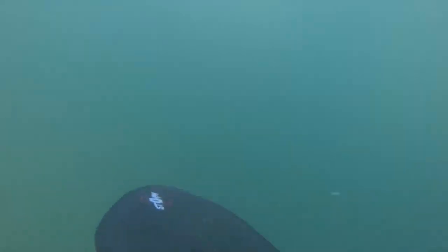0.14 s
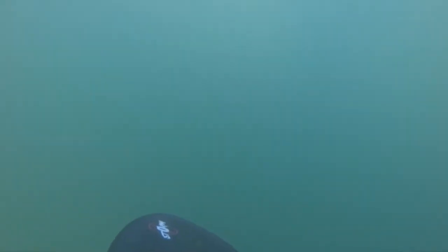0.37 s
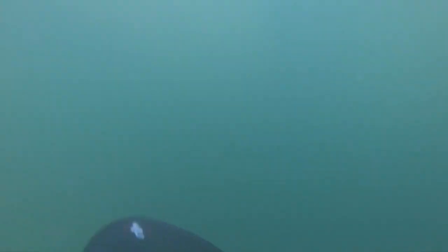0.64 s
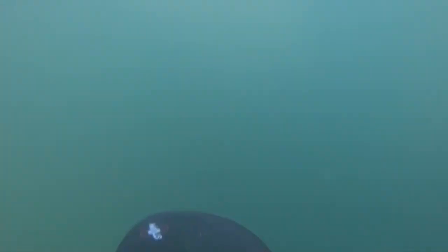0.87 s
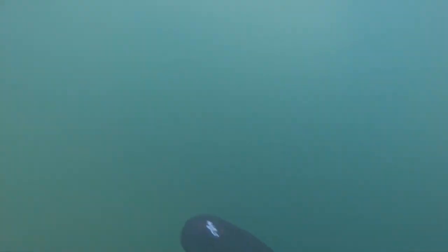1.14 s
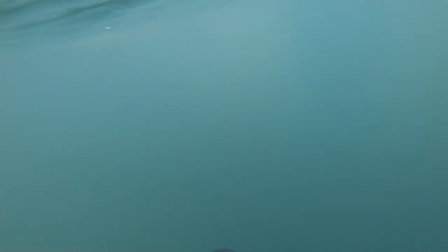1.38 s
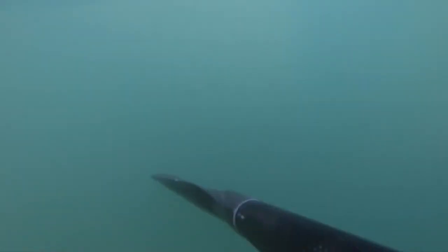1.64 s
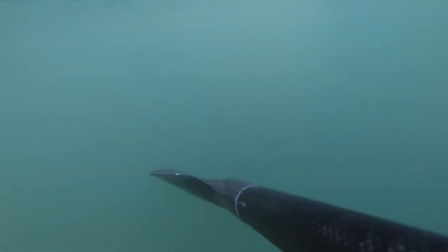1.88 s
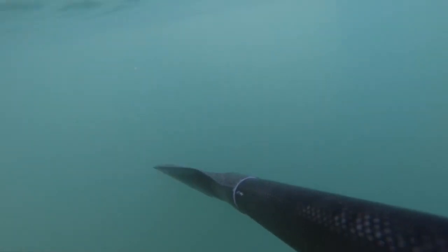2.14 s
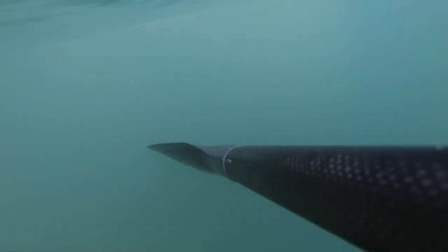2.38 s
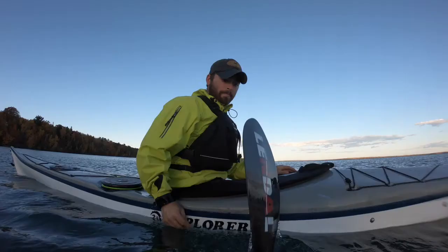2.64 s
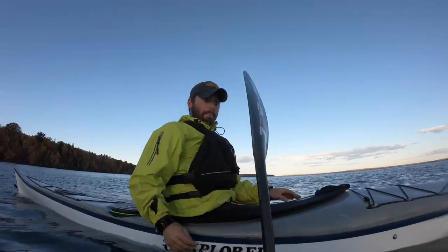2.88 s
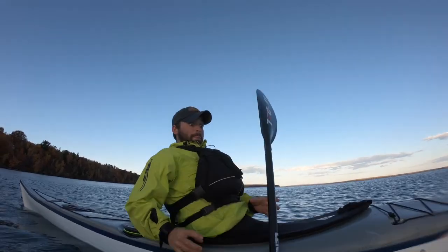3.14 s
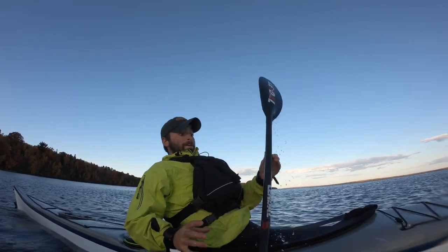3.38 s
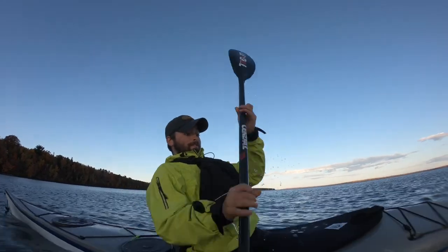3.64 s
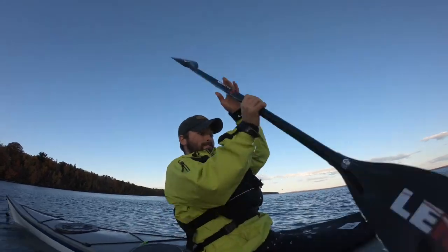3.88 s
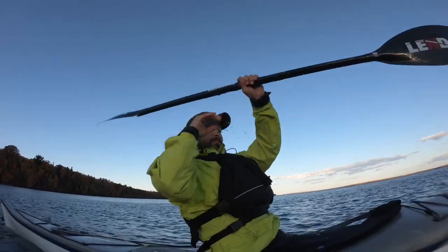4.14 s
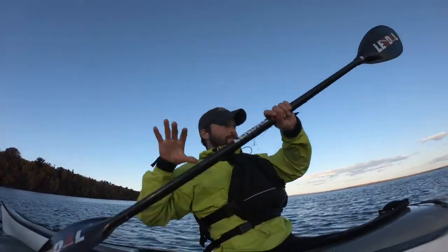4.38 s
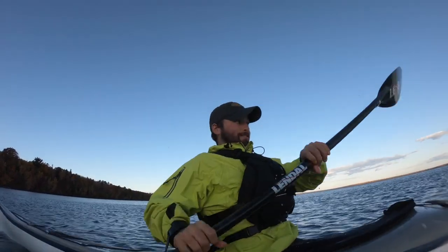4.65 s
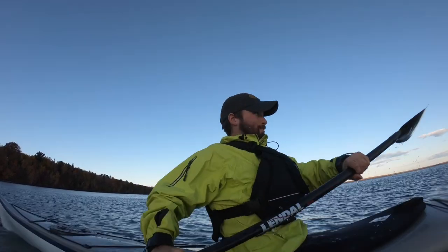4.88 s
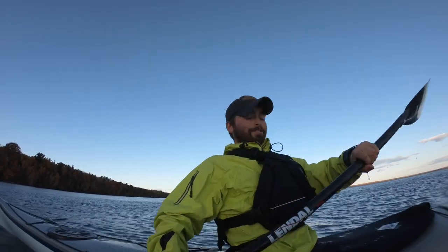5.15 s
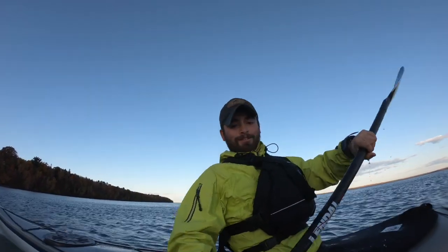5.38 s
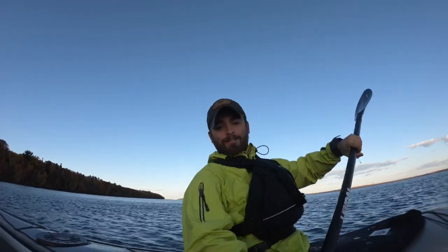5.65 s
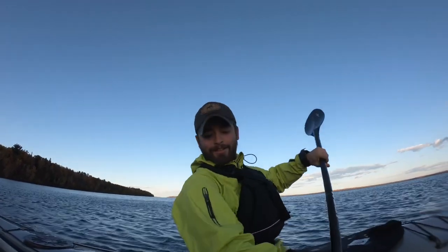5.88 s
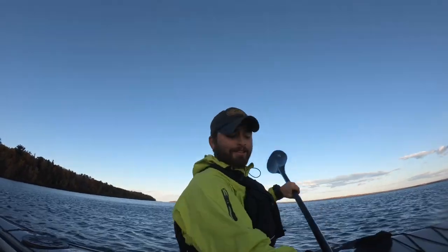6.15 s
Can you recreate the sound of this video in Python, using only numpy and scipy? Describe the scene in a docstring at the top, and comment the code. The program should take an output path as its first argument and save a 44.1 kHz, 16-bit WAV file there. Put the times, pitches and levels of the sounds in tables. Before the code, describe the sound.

From 0 to 2.7 seconds the sound is submerged, close and loud: deep turbulent rumble around a paddle blade, bubbly gurgling and fine fizz over a wide, steady wash. Hollow gulps and low thuds cluster near 0.35, 0.6 and 0.9 seconds, with the heaviest at about 1.65 and more around 2.0 to 2.4, including a quick rising plink near 2.2. At 2.7 it switches above the lake; the wash lingers, fading between 3 and 4.1. Low wind thumps the sealed housing, with a sharp splash and plop at 3.25 and a bubbling knock at 3.36. From 4 to 5 seconds, muffled jacket crackle, ticks and drops accompany the swung paddle, densest around 4.5 to 4.6. Sparse drips and wind buffets continue, a strong one near 5.45. From 5.85 to the end at about 6.3, rustle and dull trickling swell as the blade enters the water, with another strong gust.

```python
"""A paddle blade churns past a microphone in a sealed housing under a lake: rumble and froth are shaped noise
and swarms of ringing bubbles, with single gulps and gliding plinks, over a wide, steady wash of noise. The view
then moves above water and the wash fades away. Lumpy low noise is underwater rumble dying away until about 4.1
s, then wind buffeting the housing; crackling noise, ticks and short pops are a rustling jacket and drops off
the swung paddle. Rustle and trickle swell at the end as the blade slides back into the water."""
import sys
import numpy as np
from scipy import signal
from scipy.io import wavfile
from scipy.ndimage import uniform_filter1d

SR = 44100
rng = np.random.default_rng(int(sys.argv[2]) if len(sys.argv) > 2 else 0)


def generate_wav(signal):
    """Clip the signal to [-1, 1] and save it as 16-bit WAV at the path in sys.argv[1]."""
    frames = np.transpose(np.atleast_2d(signal))
    scaled = np.clip(frames, -1, 1) * 32767
    pcm = np.round(scaled).astype(np.int16)
    wavfile.write(sys.argv[1], SR, pcm)


def linear_from_db(decibels):
    """Turn decibels (scalar or array-like) into linear amplitude factors; 0 gives 1."""
    return 10 ** (np.asarray(decibels, float) / 20)


N = 276066  # length in samples
CUT_S = 2.7  # the move from under water to above it

# rustle and trickle through the housing: (time [s], bright rustle level [dB], dull trickle level [dB])
RUSTLE = [(2.7, -55, -47), (3.0, -58, -52), (3.25, -59, -54), (3.36, -44, -40), (3.55, -56.5, -50.5),
          (3.77, -52.5, -44), (3.92, -55, -49.5), (4.1, -47.5, -51), (4.28, -51, -48), (4.5, -51.5, -49.5),
          (4.64, -55, -52), (4.87, -55, -53), (5.0, -59, -59), (5.25, -63, -57), (5.58, -55, -54),
          (5.8, -51, -43), (5.9, -41, -34.5), (6.14, -43.5, -33), (6.26, -37, -34)]


def read(points, hz):
    """Reads a spectrum in dB, interpolated on a log-frequency axis."""
    f, value = np.transpose(points)
    return np.interp(np.log(hz + 1), np.log(f + 1), value)


def evened(x):
    """Scales to rms 1."""
    return x / np.sqrt(np.mean(x ** 2) + 1e-20)


def curve(rows, column):
    """One column of a time table, sample by sample."""
    rows = np.array(rows)
    return np.interp(np.arange(N) / SR, rows[:, 0], rows[:, column])


def swells(base_db, rows, column, db_per_s):
    """Adds to a level, in power, events that rise, hold and fall; db_per_s is (rise, fall)."""
    t = np.arange(N) / SR
    rise, fall = db_per_s
    power = linear_from_db(base_db) ** 2
    for row in rows:
        start, hold = row[:2]
        below_db = np.maximum(rise * (start - t), fall * (t - start - hold))
        power = power + linear_from_db(row[column] - np.clip(below_db, 0, 200)) ** 2
    return 10 * np.log10(power)


def noise(spectrum, size, patchy_db, flicker_db):
    """Coloured noise with random patches in time and pitch and a flicker shared by all pitches."""
    frames, hz = 4 * N // size + 5, np.fft.rfftfreq(size, 1 / SR)
    real, imag, patches = rng.standard_normal((frames, len(hz), 3)).T
    patches = uniform_filter1d(patches, size=5, axis=0)  # across pitch
    patches = evened(uniform_filter1d(patches, size=6, axis=1))  # across time
    flicker = evened(uniform_filter1d(rng.standard_normal(frames), size=3))
    level_db = read(spectrum, hz)[:, None] + patchy_db * patches + flicker_db * flicker
    bins = (real + 1j * imag) * linear_from_db(level_db)
    return evened(signal.istft(bins, nperseg=size, noverlap=size * 3 // 4)[1][:N])


def bubble(hz, t60, climb, rise):
    """A ringing air pocket: soft start, exponential decay, pitch drifting in proportion to climb."""
    t = np.arange(int(t60 * SR) + 8) / SR
    envelope = np.minimum(t / rise, 1) * linear_from_db(-60 * t / t60)
    return envelope * np.sin(2 * np.pi * hz * t * (1 + climb * t / t60))


def swarm(per_s, lo_hz, hi_hz, cycles, climb, spread_db):
    """Many small bubbles at random moments, a few of them far louder; lower ones are louder."""
    out = np.zeros(N)
    births = rng.random((24, round(per_s * N / SR / 24), 2))  # 24 pitches
    for k, (when, size) in enumerate(births.transpose(0, 2, 1)):
        hz = lo_hz * (hi_hz / lo_hz) ** (k / 23)
        strength = linear_from_db(spread_db * np.minimum(-np.log(1 - size), 3.5))
        train = np.bincount((when * N).astype(int), strength, N)
        # of every three pitches, one sinks and two climb
        ring = bubble(hz, cycles / hz, climb * (k % 3 - .5), 1.9 / hz)
        out += signal.oaconvolve(train, ring * np.sqrt(lo_hz / hz))[:N]
    return evened(out)


def add(mix, s, sound):
    """Mixes a sound in at a time in seconds."""
    part = mix[round(s * SR):][:len(sound)]
    part += sound[:len(part)]


def pops(rows, climb):
    """Air pockets that swell, ring a few cycles with rising pitch and die, loudest at the time given."""
    out = np.zeros(N)
    for s, db, hz, width in rows:
        rise = 0.485 * width
        u = np.arange(int(7 * rise * SR)) / SR / rise  # 1 at the peak
        swell = (u * np.exp(1 - u)) ** 2
        add(out, s - rise, linear_from_db(db) * swell * np.sin(2 * np.pi * hz * rise * u * (1 + climb * (u - 2))))
    return out


def churn():
    """Flow round the blade: turbulent rumble, gurgle of bubbles, and a fine fizz that spreads wide."""
    # flow strength: (time [s], rumble level [dB], froth level [dB])
    flow = [(0.0, -16, -52.5), (0.13, -21, -44.5), (0.25, -23, -50), (0.53, -21.5, -44), (0.86, -23, -51.5),
            (1.22, -24.5, -54), (1.54, -21.5, -43), (1.9, -19.5, -45.5), (2.01, -19, -45),
            (2.25, -19.5, -38.5), (2.45, -24.5, -44), (2.59, -22, -51.5), (2.7, -23, -53)]
    # colours of the three layers: (frequency [Hz], relative level [dB])
    rumble_spectrum = [(25, -29), (60, 11), (115, -10), (200, -3), (400, -15.5), (800, -41), (1500, -67.5)]
    gurgle_spectrum = [(250, -31), (500, 0), (900, -4.5), (1400, -5.5), (2500, -15), (4500, -30.5),
                       (9000, -50.5)]
    fizz_spectrum = [(1500, -5.5), (3000, -7.5), (5000, -2.5), (8000, -9), (11000, -15.5), (13000, -18),
                     (15700, -22)]
    # sudden bursts of froth: (start [s], hold [s], gurgle level [dB], fizz level [dB])
    bursts = [(0.037, 0.046, -29.5, -64.5), (0.903, 0.0096, -21.5, -50), (2.068, 0.0031, -30.5, -33.5),
              (2.205, 0.098, -23.5, -49)]
    burst_db_per_s = (1502, 1300)  # rise, fall

    rumble = noise(rumble_spectrum, 1024, 1.55, 1.43)
    gurgle = noise(gurgle_spectrum, 512, 2, 1.5) + .9 * swarm(1100, 700, 4200, 24, .25, 3.4)
    fizz = noise(fizz_spectrum, 256, 2, 2) + .5 * swarm(700, 3000, 13000, 10, .2, 4.5)
    spray_spectrum = [(f, db - 7 * (f < 7000) + 7 * (f > 10000)) for f, db in fizz_spectrum]
    spray = np.array([noise(spray_spectrum, 256, 2, 1.5) for ear in "LR"])

    froth_db = curve(flow, column=2)
    # the gurgle lies 15 dB over the froth at -47 dB and swings a little wider
    gurgle_db = swells(15 - 47 + 1.07 * (froth_db + 47), bursts, 2, burst_db_per_s)
    fizz_db = swells(froth_db, bursts, 3, burst_db_per_s)
    middle = linear_from_db(curve(flow, column=1)) * rumble + linear_from_db(gurgle_db) * evened(gurgle)
    return middle + linear_from_db(fizz_db) * (evened(fizz) + 0.47 * spray)


def gulps():
    """Air pockets torn off the blade ring at their own pitch, from deep thuds to high gulps."""
    # single pockets: (time [s], peak level [dB], pitch at the peak [Hz], width [s])
    pockets = [(0.163, -13, 620, 0.0051), (0.336, -6, 163, 0.0061), (0.337, -7.5, 360, 0.0045),
               (0.396, -15, 148, 0.011), (0.402, -10, 447, 0.002), (0.417, -8.5, 106, 0.0097),
               (0.522, -29, 3700, 0.004), (0.612, -10, 755, 0.0063), (0.612, -12, 1320, 0.0041),
               (0.613, -7.5, 548, 0.0081), (0.615, -6, 102, 0.019), (0.642, -5.5, 120, 0.0059),
               (0.705, -13, 680, 0.011), (0.72, -16.5, 680, 0.0139), (0.731, -10, 725, 0.0059),
               (0.733, -21.5, 1350, 0.005), (0.751, -17, 780, 0.0128), (0.903, -10.5, 770, 0.012),
               (0.914, -12.5, 1180, 0.0051), (0.914, -19, 794, 0.029), (0.914, -6.5, 523, 0.014),
               (0.918, -2, 150, 0.0046), (0.932, -7, 94, 0.011), (0.95, -16, 87, 0.017),
               (0.971, -6.5, 490, 0.0041), (0.977, -14.5, 753, 0.0151), (0.978, -9, 134, 0.0124),
               (1.358, -31.5, 3790, 0.006), (1.625, -10.5, 602, 0.0119), (1.631, -6, 374, 0.016),
               (1.636, -5.5, 140, 0.014), (1.643, 1.5, 450, 0.0036), (1.654, -9.5, 108, 0.026),
               (1.656, 1, 424, 0.0037), (1.672, -8, 116, 0.023), (1.906, -12, 131, 0.029),
               (2.032, -8.5, 643, 0.0069), (2.036, -7.5, 108.4, 0.023), (2.152, -9.5, 1290, 0.005),
               (2.166, -9, 89, 0.02), (2.21, -24, 2310, 0.004), (2.261, -30, 5200, 0.0033),
               (2.385, -10.5, 128, 0.021), (2.388, -4.5, 398, 0.0026), (2.388, -10, 1410, 0.0018),
               (2.397, -2.5, 132, 0.021), (2.46, -27.5, 2960, 0.004), (3.245, -11, 1120, 0.0022),
               (3.247, -8.5, 438, 0.0064), (3.258, -18, 128, 0.0069), (3.362, -9, 472, 0.013),
               (3.643, -20, 120, 0.0087)]
    return pops(pockets, climb=0.0085)


def plinks():
    """Bubbles whose pitch climbs as they near the surface (one holds its pitch), with a wobbling ring."""
    # single bubbles: (time [s], level [dB], start pitch [Hz], end pitch [Hz], length [s])
    gliding = [(2.196, -18, 666, 1490, 0.049), (4.214, -40.5, 715, 940, 0.039),
               (4.734, -38.5, 1470, 1750, 0.031), (4.888, -35, 702, 1210, 0.043),
               (5.168, -44, 930, 930, 0.031), (5.678, -35, 1220, 1980, 0.035)]
    out = np.zeros(N)
    for s, db, hz, end_hz, length in gliding:
        wobble = linear_from_db(3 * evened(uniform_filter1d(rng.standard_normal(4096), size=150)))
        t = np.arange(int(length * SR)) / SR
        glide = np.sin(2 * np.pi * t * (hz + (end_hz - hz) * t / length / 2))
        envelope = signal.windows.tukey(len(t), .8) * linear_from_db(-8 * t / length)
        add(out, s, linear_from_db(db) * glide * envelope * wobble[:len(t)])
    return out


def wind_and_rumble():
    """Lumpy low noise, first underwater rumble dying away until about 4.1 s, then wind on the housing; it
    reaches higher in pitch the harder it blows."""
    # low noise between the buffets, underwater rumble dying away until about 4.1 s, then wind: (time [s], level
    # [dB])
    low_noise = [(2.7, -20), (3.2, -24.5), (3.65, -24.5), (3.75, -30), (3.95, -32.5), (4.15, -46.5),
                 (4.32, -44), (4.5, -37.5), (4.87, -44), (5.3, -38.5), (5.6, -40), (5.95, -36.5), (6.26, -44)]
    # single buffets: (start [s], hold [s], level [dB])
    buffets = [(3.253, 0.023, -14), (3.391, 0.019, -22), (4.017, .015, -25), (4.074, 0.032, -28.5),
               (4.18, 0.024, -39), (4.411, .012, -31), (4.499, 0.026, -34), (4.597, 0.025, -34),
               (4.657, 0.034, -24.5), (4.776, .012, -38), (4.95, 0.036, -23), (5.097, 0.043, -27),
               (5.182, 0.042, -30), (5.237, 0.016, -29.5), (5.34, 0.027, -36), (5.437, 0.079, -16.5),
               (5.551, 0.049, -33), (5.638, 0.016, -35), (5.744, 0.041, -39.5), (5.907, 0.028, -35),
               (6.013, .04, -31), (6.072, 0.0073, -18.5), (6.11, 0.022, -28), (6.217, .06, -16)]
    # colours of weak and strong wind: (frequency [Hz], relative level [dB])
    breeze_spectrum = [(20, -16.5), (40, -0.5), (80, 7.5), (140, -16.5), (250, -11), (500, -56),
                       (1500, -103)]
    gust_spectrum = [(20, -23), (60, -1.5), (130, 10), (220, -1), (400, -10), (800, -22.5), (1500, -37),
                     (3000, -82)]

    level_db = swells(curve(low_noise, 1), buffets, 2, db_per_s=(709.5, 595))
    hard = np.clip((level_db + 39.5) / 24, 0, 1)
    breeze = noise(breeze_spectrum, 1024, 1.6, 0.64)
    gust = noise(gust_spectrum, 512, 3.5, 3.2)
    blow = np.sqrt(1 - hard) * breeze + np.sqrt(hard) * gust
    # evened out over about 30 ms, so that the level curve rules
    strength = np.sqrt(signal.oaconvolve(blow ** 2, np.hanning(2600) / 1300, "same") + .05)
    return linear_from_db(level_db) * blow / strength


def surface():
    """Crackling cloth, gurgling water, ticks and drops, all dulled by the housing wall."""
    # colour of sound through the housing: (frequency [Hz], relative level [dB])
    housing = [(300, -31), (500, -8), (750, -0.5), (1300, -19), (1800, -0.5), (2400, -2), (2800, -3.5),
               (3300, -18.5), (3900, -15), (4500, -12), (5300, -19.5), (6500, -26.5), (7500, -35.5),
               (10000, -48.5), (13000, -93)]
    # short splashes off the swung paddle: (start [s], hold [s], bright level [dB], dull level [dB])
    splashes = [(3.245, 0.0064, -43, -36), (4.51, .015, -44, -44), (4.556, 0.037, -43, -37),
                (4.925, 0.005, -56, -46), (5.084, 0.029, -54, -67), (5.4, .02, -59, -61),
                (5.639, 0.0095, -49, -38)]
    # the loudest drops landing in water: (time [s], level [dB], pitch at the peak [Hz], width [s])
    loud_drips = [(4.006, -35, 2010, 0.0079), (4.111, -35, 2000, 0.0017), (4.312, -30.5, 970, 0.0032),
                  (4.371, -28.5, 3080, 0.0022), (4.482, -27.5, 935, 0.0013), (4.518, -31.5, 610, 0.008),
                  (4.525, -31, 1160, 0.006), (4.531, -24, 780, 0.0046), (4.549, -36, 1030, 0.018),
                  (4.572, -21.5, 970, 0.0015), (4.59, -26, 675, 0.004), (4.602, -32, 810, 0.0073),
                  (4.625, -43, 836, 0.025), (4.946, -33, 2220, 0.0036), (5.181, -45, 1880, 0.013),
                  (5.514, -32, 1630, 0.0054), (5.644, -31, 1730, 0.0041), (5.645, -29.5, 1100, 0.0068),
                  (5.714, -22.5, 2610, 0.0025), (5.763, -32, 2400, 0.003), (5.767, -38, 870, 0.0096),
                  (5.826, -27, 2300, 0.0035), (6.023, -30, 820, 0.0068)]
    # the sharpest ticks of spray and cloth: (time [s], level [dB])
    sharp_ticks = [(2.831, -22), (2.952, -29.5), (3.055, -29), (3.074, -31.5), (3.244, -15.5), (3.341, -35),
                   (3.382, -37.5), (3.432, -36.5), (3.606, -35), (3.754, -28.5), (4.009, -33), (4.03, -33),
                   (4.045, -28.5), (4.089, -32.5), (4.14, -36.5), (4.216, -31.5), (4.268, -34),
                   (4.281, -34), (4.372, -31), (4.481, -32), (4.56, -29), (4.573, -21), (4.586, -32),
                   (4.599, -27), (4.74, -39), (4.824, -38), (4.872, -34), (4.943, -32.5), (5.099, -44),
                   (5.395, -42), (5.422, -41), (5.553, -44), (5.613, -39.5), (5.651, -37)]
    splash_db_per_s = (1196, 609)  # rise, fall

    grains = evened(uniform_filter1d(rng.standard_normal(N), size=120))  # of about 3 ms
    crackle = linear_from_db(0.59 * grains)
    bright = noise([(f, db - 18 * (f < 3200)) for f, db in housing], 256, 2.5, 1.73)
    dull = noise([(f, db - 18 * (f > 3200)) for f, db in housing], 256, 3, 1)
    dull = dull + 1.4 * swarm(900, 850, 2800, 36, .3, 3)
    bright_db = swells(curve(RUSTLE, 1), splashes, 2, splash_db_per_s)
    dull_db = swells(curve(RUSTLE, 2), splashes, 3, splash_db_per_s)

    small_ticks, small_drips = scattered()
    spits, rings = struck_housing(sharp_ticks + small_ticks)
    rustle = (linear_from_db(bright_db) * crackle + spits) * bright
    trickle = linear_from_db(dull_db) * evened(dull)
    drops = pops(loud_drips + small_drips, climb=0.036) * (1 + 0.17 * dull)  # roughened by the water around
    wall = signal.butter(4, 7800, fs=SR, output="sos")  # shuts out the treble above 7800 Hz
    return signal.sosfilt(wall, trickle + drops + rings + rustle)


def struck_housing(ticks):
    """Each tick rings the modes of the housing and trails a short spit: returns spit envelope and rings."""
    # housing modes: (nominal frequency [Hz], nominal level [dB], decay by 60 dB [s])
    shell = [(2910, -9, 0.012), (4120, -2, 0.013), (4780, -8, 0.0032), (5200, -9, 0.0048),
             (6500, -13, 0.0094)]
    spits, rings = np.zeros(N), np.zeros(N)
    chances = rng.uniform(-1, 1, (len(ticks), len(shell), 2))  # each tick lands on another spot
    for (s, db), chance in zip(ticks, chances):
        add(spits, s, linear_from_db(db - 8.5 - 60 * np.arange(1500) / SR / 0.027))
        for (hz, mode_db, t60), (shift, struck) in zip(shell, chance):
            ring = bubble(hz * (1 + .05 * shift), t60, climb=0, rise=.0004)
            add(rings, s, linear_from_db(db + mode_db + 3 * struck) * ring)
    return spits, rings


def scattered():
    """Rows for small ticks and drops at random moments above water, set by the rustle and trickle there."""
    count = 70  # of each kind
    when, size, pitch = rng.random((2 * count, 3)).T
    s = CUT_S + when * (N / SR - CUT_S - .02)
    spread_db = 5 * (2 * size - 1)
    at, hz = (s * SR).astype(int), 800 * 3.2 ** pitch
    ticks = np.c_[s, spread_db + 8 + curve(RUSTLE, column=1)[at]]
    drips = np.c_[s, spread_db + 6 + curve(RUSTLE, column=2)[at], hz, 5.5 / hz]
    return ticks[:count].tolist(), drips[count:].tolist()


def wash():
    """Steady underwater noise, unrelated in the two ears; its deep part heaves."""
    # colours of the wash and its deep part: (frequency [Hz], relative level [dB])
    wash_spectrum = [(15, -52), (25, 7), (58, -11), (290, -10.5), (350, -7.5), (553, 1.5), (764, -9.5),
                     (1500, -20.5), (2240, -29.5), (6080, -44), (8860, -51.5), (15600, -69.5)]
    heave_spectrum = [(15, -23), (28, 5), (60, 1), (110, 6), (170, -38), (400, -67)]
    fade = np.interp(np.arange(N) / SR, (3.01, 4.134), [1, 0])  # fades out between these times [s]
    heave = np.array([noise(heave_spectrum, 2048, 6, 1.6) for ear in "LR"])
    wide = np.array([noise(wash_spectrum, 1024, 1.45, 1.0) for ear in "LR"])
    return fade * (linear_from_db(-21) * wide + linear_from_db(-32.0) * heave)


def scene():
    """One microphone in the middle, first under water and then above; the wash lies wide around it."""
    above = np.clip((np.arange(N) / SR - CUT_S) / .008, 0, 1)  # crossfade of 8 ms
    blade = (1 - above) * churn() + gulps() + plinks()
    return blade + above * (wind_and_rumble() + surface()) + wash()


def low_pass(x):
    """Removes everything above the highest recorded frequency."""
    return signal.sosfilt(signal.butter(12, 15750, fs=SR, output="sos"), x)


def record(dry):
    """The deepest rumble below about 28 Hz is taken away, and the sound clips at full scale."""
    firm = signal.sosfilt(signal.butter(2, 28, "highpass", fs=SR, output="sos"), dry)
    return low_pass(np.clip(firm, -1, 1))


dry = scene()
out = record(dry)
generate_wav(out)
```